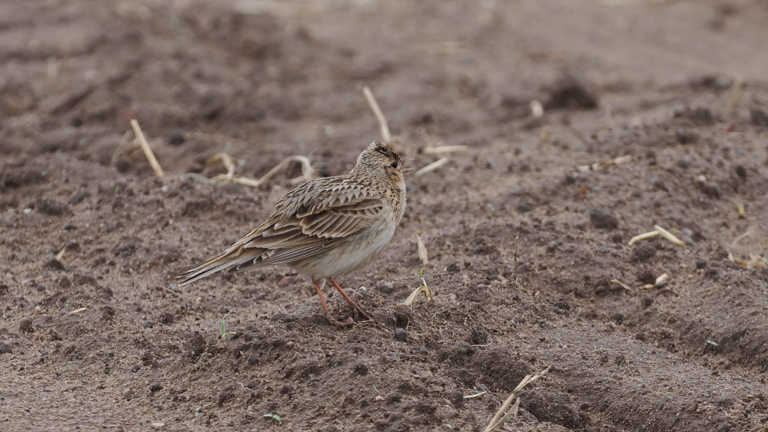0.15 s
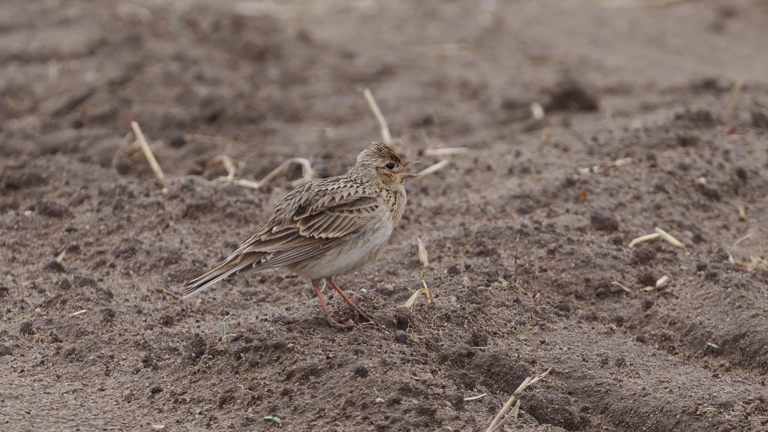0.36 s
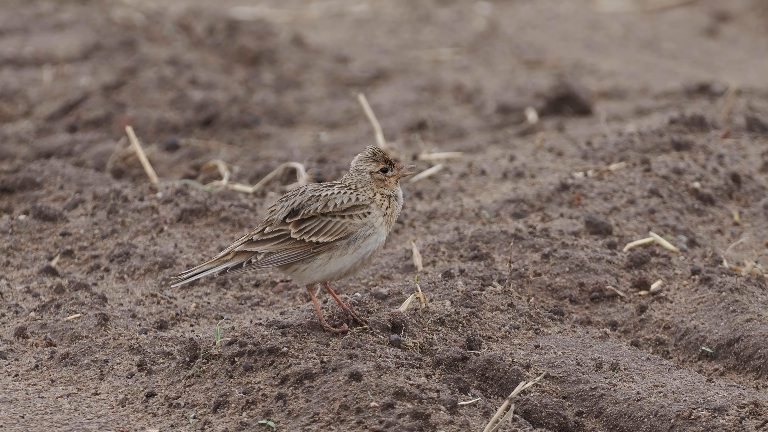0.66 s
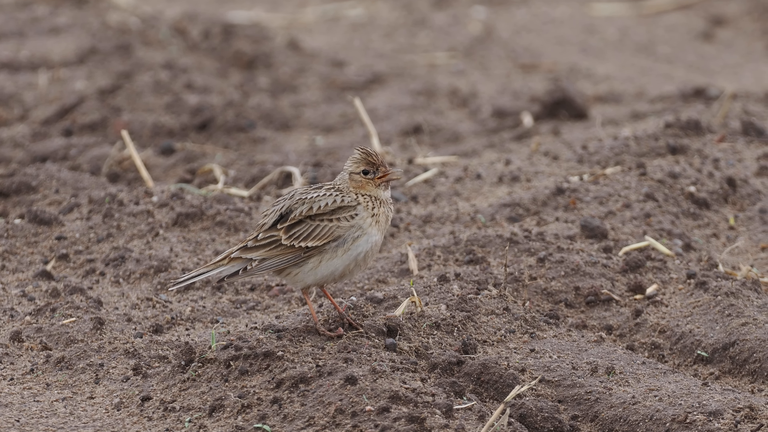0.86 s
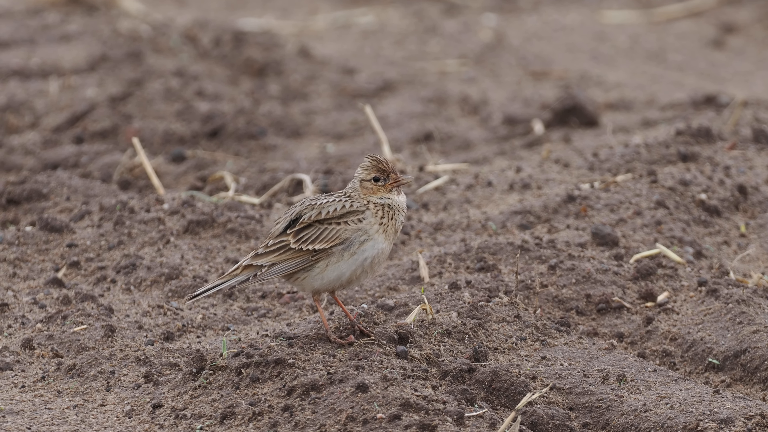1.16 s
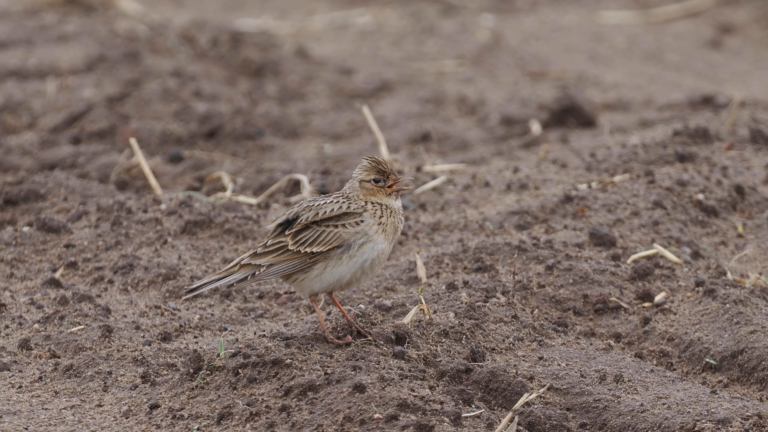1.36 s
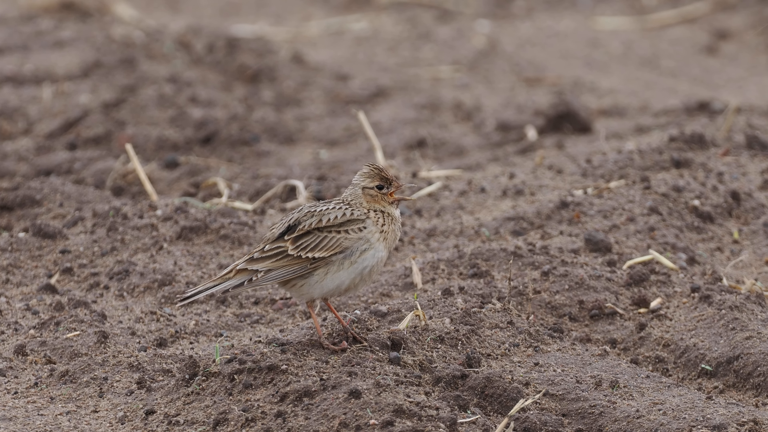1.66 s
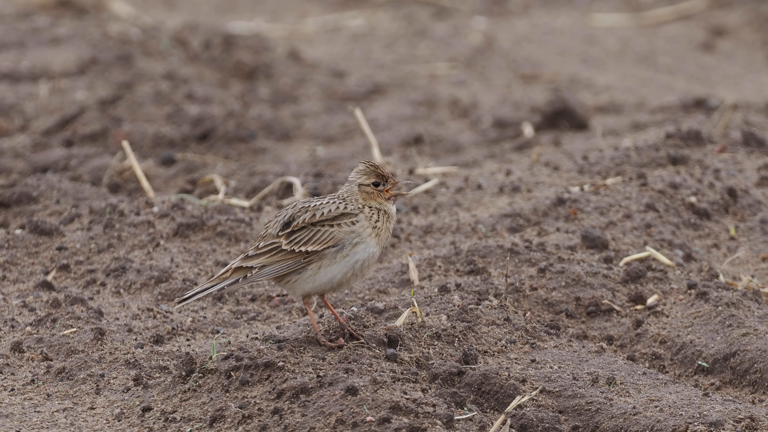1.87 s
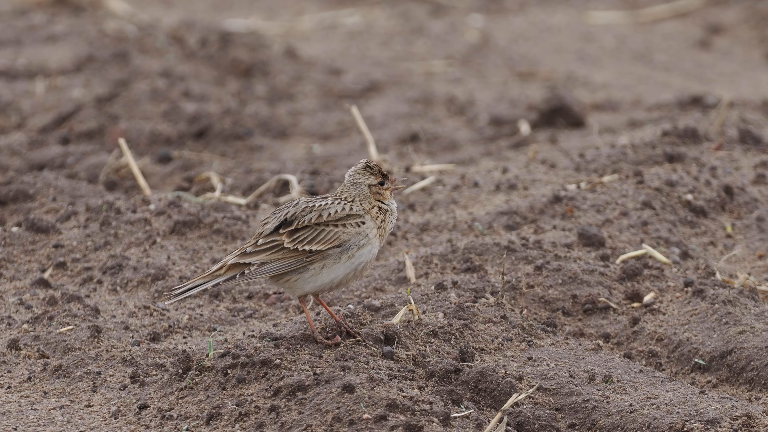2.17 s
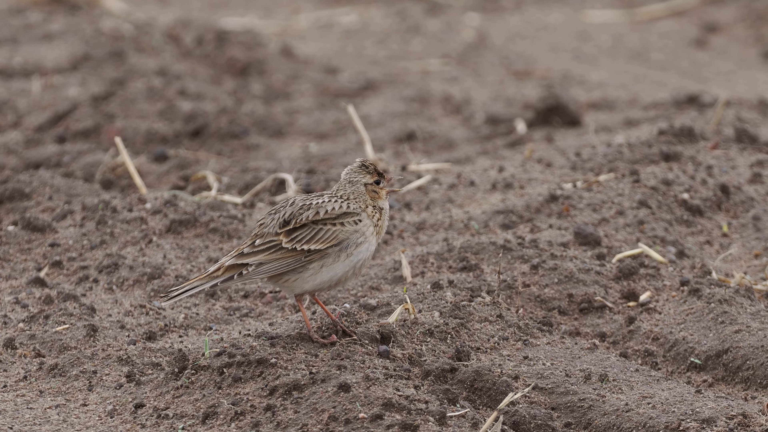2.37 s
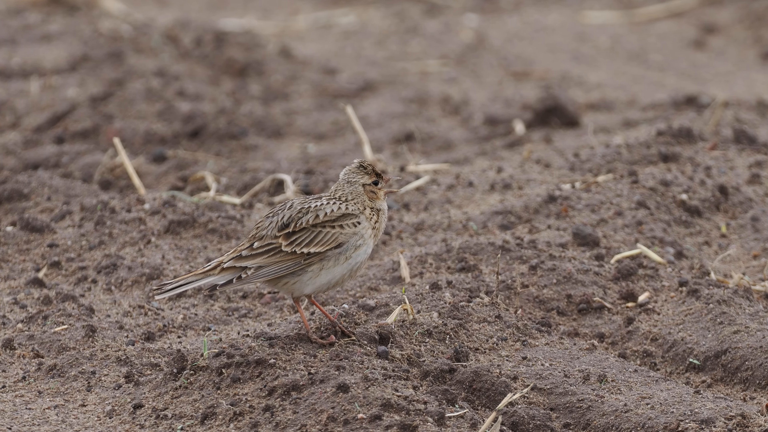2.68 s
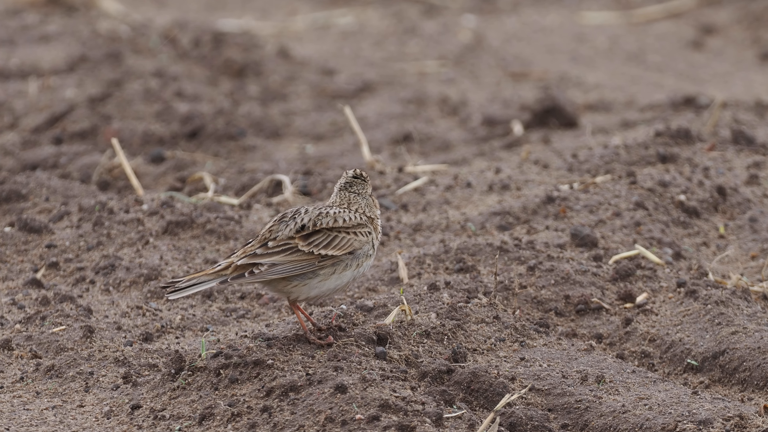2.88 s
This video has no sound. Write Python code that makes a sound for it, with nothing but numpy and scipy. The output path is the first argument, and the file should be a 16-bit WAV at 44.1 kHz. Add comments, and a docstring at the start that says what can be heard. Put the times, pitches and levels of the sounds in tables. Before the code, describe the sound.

Rapid, high skylark song in an open field, with low gusts of wind underneath.

```python
"""Skylark over a windy field

A skylark sings: chirrs, three sliding buzzes, a chatter, a slur into a trill, five pips and a wobbling
whistle. Every syllable is one swept tone with overtones, mostly weak, but with a strong second harmonic
in the chatter. Throat and beak colour the song and the bare ground scatters it briefly.
Wind rumbles on the microphone and gusts buffet its right side, over a faint distant wash."""
import sys
import numpy as np
from scipy import signal
from scipy.fft import rfft, irfft
from scipy.io import wavfile
from scipy.ndimage import uniform_filter1d

SR = 44100
rng = np.random.default_rng(int(sys.argv[2]) if len(sys.argv) > 2 else 0)


def to_wav(s):
    """Save 16-bit WAV."""
    ch = np.atleast_2d(s).T  # columns
    pcm = np.round(np.clip(ch, -1, 1) * 32767)  # PCM
    wavfile.write(sys.argv[1], SR, pcm.astype(np.int16))


N = 132300


def syrinx(hz, level, jitter_hz, overtones_db):
    """The bird's voice: a swept tone and its overtones, each weighted by the beak at its own pitch."""
    # resonances of throat and beak: frequency_hz, gain_db
    beak = [(1800, -13), (2400, -9), (3000, -8), (3700, -12.5), (4000, -12.5), (4400, -4), (5000, -2.5),
            (5600, -13), (6300, -24.5), (7500, -7), (9000, -34.5), (15000, -20)]
    hz = hz + jitter_hz * tremor(np.arange(len(hz)) / SR, top_hz=756)
    phase = 2 * np.pi * np.cumsum(hz) / SR
    return level * sum(amp(db + read(beak, k * abs(hz))) * (k * hz < SR / 2) * np.sin(k * phase)
                       for k, db in enumerate(overtones_db, 1))


def chirrs():
    """In each chirr a head of quick high warbles sinks into a tail of slower low ones."""
    # chirrs: start_s, length_s, tempo_factor, pitch_factor, head_db, tail_db
    cues = [(-.099, 0.12, 0.98, 1.02, -26, -24.5), (0.0575, 0.13, 0.92, .99, -25, -22.5),
            (.219, 0.12, 0.99, 1.01, -22.5, -21), (.387, 0.13, .99, 0.97, -15.5, -21.5),
            (.570, 0.14, 0.97, 0.96, -20.5, -21.5), (1.266, .111, 0.94, 0.95, -7, -21),
            (1.4137, .13, 1, .99, -13.5, -22.5), (1.977, 0.13, 0.96, 0.97, -16.5, -20),
            (2.1395, .122, 0.99, 0.97, -17, -22)]
    # one chirr at tempo and pitch factor 1: time_s, centre_hz, depth_hz, warbles_per_s, tail_share
    course = [(0, 4340, 604, 85, 0), (.014, 4500, 605, 94, 0.38), (.029, 4350, 655, 83, 0),
              (.04, 3750, 754, 70.5, 1), (.054, 3240, 700, 58, 0.9), (.072, 2970, 640, 57.6, 0.99),
              (.125, 2680, 616, 47.8, 1)]
    # one head warble and one tail warble, crest to crest: turn_share, pitch_swing, level_db
    head_warble = [(0, 1, -10), (.13, 0.13, -9.5), (.29, -1.148, -14), (.43, -0.264, 0), (.57, 0.113, 5.5),
                   (.7, 0.039, -2.5), (.84, 0.094, -23.5)]
    tail_warble = [(0, 1.3, -17), (.16, .05, 1.5), (.33, -1.15, -14.5), (.54, -.1, 1.5), (.7, 0.87, -8.5),
                   (.86, -0.082, -12.5)]
    for start, length, tempo, pitch, head_db, tail_db in cues:
        t = np.arange(0, length, 1 / SR)
        centre, depth, rate, tail = follow(course, t * tempo)
        turns = 0.289 + np.cumsum(rate * tempo) / SR  # opens at the bottom of a warble
        swing, db = (1 - tail) * cycle(head_warble, turns) + tail * cycle(tail_warble, turns)
        hz = pitch * (centre + depth * swing)
        level = amp(head_db + (tail_db - head_db) * tail + db) * gate(t, 0.0095, 0.0079)
        yield start, syrinx(hz, level, jitter_hz=50 + 130 * tail, overtones_db=(0, -21, -24))


def buzzes():
    """Falling whistles whose pitch bounces rapidly, loudest at each crest, hoarser as they sink."""
    # buzzes: start_s, length_s, level_db
    cues = [(0.7432, 0.12, -14.5), (0.9157, 0.14, -14.5), (1.089, 0.13, -13.5)]
    # one buzz: time_s, centre_hz, depth_hz (the bounce spans 0.8 of it), bounces_per_s, level_db
    course = [(0, 4454, 620, 310, -23), (.012, 4710, 1015, 300, 2), (.026, 4670, 1200, 290, 4),
              (.046, 4313, 870, 275, 4), (.064, 3850, 1050, 265, 1.5), (.08, 3250, 1020, 255, -6),
              (.103, 2660, 744, 230, -7.5), (.135, 2460, 309, 195.5, -11.5)]
    for start, length, level_db in cues:
        t = np.arange(0, length, 1 / SR)
        centre, depth, rate, db = follow(course, t)
        bounce = np.sin(np.pi * np.cumsum(rate) / SR) ** 2
        hz = centre + .8 * depth * (bounce - .62)
        level = amp(level_db + db) * (0.32 + 0.65 * bounce) * gate(t, 0.0042, 0.0033)
        hoarse = np.clip(t / .075, 0, 1) ** 2
        tone = syrinx(hz, level, jitter_hz=35 + 110 * hoarse, overtones_db=(0, -18, -21))
        sizzle = amp(-43) * tone * rng.standard_normal(len(t))
        yield start, tone + sizzle


def chatter():
    """Phrases of seven short notes that scoop to their pitch; the beak favours their second harmonic."""
    # phrases: start_s, pitch_factor, level_db
    phrases = [(1.5759, 1.01, -24.5), (1.707, 1.01, -23), (1.841, 1.025, -22.5)]
    # notes of a phrase at pitch factor 1: offset_s, length_s, pitch_hz, level_db
    notes = [(0, 0.0062, 2760, 4), (.0095, 0.0058, 3795, 4), (0.018, 0.0092, 3440, -0.5),
             (.030, 0.014, 3200, -2.5), (0.0442, .016, 2840, 1.5), (.063, .018, 2486, -1),
             (0.082, 0.021, 2126, -7)]
    scoop_from_hz, scoop_s, sag_hz_per_s = 2165, 0.0031, 6000
    for start, pitch, level_db in phrases:
        for offset, length, note_hz, db in notes:
            t = np.arange(0, length, 1 / SR)
            scoop = (scoop_from_hz - note_hz) * np.exp(-(t / scoop_s) ** 2)
            hz = pitch * (note_hz + scoop - sag_hz_per_s * t)
            level = amp(level_db + db) * gate(t, 0.005, 0.42 * length)
            jitter_hz = 20 + 90 * np.exp(-offset / 0.033)
            yield start + offset, syrinx(hz, level, jitter_hz, overtones_db=(-6.5, 2, -11.5, -9.5, -17))


def slur():
    """A thin high tone that falls into the beak's resonance."""
    # the downward glide: time_s, pitch_hz, level_db
    course = [(2.322, 6440, -23), (2.333, 6520, -17), (2.343, 6390, -15), (2.350, 5700, -16),
              (2.356, 5110, -13), (2.362, 3680, -33)]
    t = np.arange(course[0][0], course[-1][0], 1 / SR)
    hz, db = follow(course, t)
    level = amp(db) * gate(t - t[0], .002, .002)
    return t[0], syrinx(hz, level, jitter_hz=70, overtones_db=(0, -15))


def trill():
    """Wide fast sweeps that flash each time they cross the beak's resonance."""
    # the trill: time_s, centre_hz, depth_hz, level_db
    course = [(2.363, 4500, 1200, -25), (2.370, 4500, 1200, -19), (2.39, 4550, 1300, -16),
              (2.411, 4550, 1300, -16), (2.422, 4600, 900, -30)]
    turns_per_s, trim_db = 91.5, -0.5
    t = np.arange(course[0][0], course[-1][0], 1 / SR)
    centre, depth, db = follow(course, t)
    swing = -np.cos(2 * np.pi * turns_per_s * (t - t[0]))
    level = amp(trim_db + db - 11 * swing ** 2) * gate(t - t[0], .001, 0.0038)
    return t[0], syrinx(centre + depth * swing, level, jitter_hz=70, overtones_db=(0, -12, -24))


def pips():
    """Short, pure, slightly arched whistles."""
    # pips: start_s, length_s, top_hz, fall_hz, level_db
    cues = [(2.452, 0.028, 4955, 600, -17), (2.498, 0.03, 4906, 300, -18.5),
            (2.543, 0.032, 4872, 243, -17.5), (2.587, 0.033, 4822, 199, -18.5),
            (2.630, 0.036, 4760, 131, -21)]
    crest = 0.16  # share of the length at which the pitch is highest
    for start, length, top_hz, fall_hz, level_db in cues:
        t = np.arange(0, length, 1 / SR)
        hz = top_hz - fall_hz * ((t / length - crest) / (1 - crest)) ** 2
        level = amp(level_db) * gate(t, 0.0088, 0.0059)
        yield start, syrinx(hz, level, jitter_hz=7.4, overtones_db=(0, -11, -16))


def wobble():
    """A whistle that flips between two sinking pitches; the voice nearly breaks at each flip."""
    # the whistle: time_s, upper_hz, lower_hz, wobbles_per_s, level_db
    course = [(2.723, 4620, 3230, 38, -26), (2.745, 4580, 3090, 37, -21.5), (2.776, 4400, 3020, 42, -26.5),
              (2.806, 4060, 2950, 37.6, -27), (2.858, 3900, 2850, 37.5, -27), (2.92, 3684, 2807, 35.3, -27),
              (2.965, 3620, 2770, 36, -30.5)]
    # one wobble, crest to crest: turn_share, height (0 lower pitch, 1 upper), level_db
    one_turn = [(0, .97, -1), (.13, .8, -2), (.22, .25, 0), (.3, -.25, -14), (.42, 0, 0), (.62, .05, -1),
                (.73, .25, -11), (.85, .8, -2)]
    hold_until_s = 2.7295  # stays on the upper pitch until then
    t = np.arange(course[0][0], course[-1][0], 1 / SR)
    upper, lower, rate, db = follow(course, t)
    turns = np.cumsum(rate * (t > hold_until_s)) / SR
    height, turn_db = cycle(one_turn, turns)
    hz = lower + (upper - lower) * height
    hoarse = np.clip(turns / 3, 0, 1)
    level = amp(db + turn_db) * gate(t - t[0], 0.0047, 0.012)
    return t[0], syrinx(hz, level, jitter_hz=15 + 95 * hoarse, overtones_db=(0, -14, -24))


def field(song):
    """Clods near the bird and the ground farther off scatter the song; it sits close to the centre."""
    # the bird's stereo balance: frequency_hz, left_minus_right_db
    balance = [(2500, -5), (3300, 1), (4500, 0.5), (8000, 2.5)]
    clods_db, clods_t60_s = -17, .035
    ground_db, ground_t60_s = -24, .12
    left_lag_s = .000019
    t = np.arange(0, .3, 1 / SR)
    taps = rng.choice([-1., 1.], (2, len(t))) * (rng.random((2, len(t))) < .1)
    near = taps[0] * amp(-60 * t / clods_t60_s) * (t > .002)
    far = (taps + taps[::-1] * .5) * amp(-60 * t / ground_t60_s) * (t > .006)
    echoes = amp(clods_db) * near / np.linalg.norm(near) + amp(ground_db) * far / np.linalg.norm(far[0])
    heard = song + signal.fftconvolve(song[None], echoes, axes=1)[:, :N]
    hz = np.fft.rfftfreq(N, 1 / SR)
    pan_db = read(balance, hz)
    left_delay = np.exp(-2j * np.pi * hz * left_lag_s)
    return irfft(rfft(heard) * [amp(pan_db / 2) * left_delay, amp(-pan_db / 2)], N)


def wind():
    """Wind on the microphone: a steady rumble on both sides, and short gusts on the right."""
    # colour of the rumble, and of a gust at brightness factor 1: frequency_hz, level_db
    rumble_colour = [(12, -8), (25, -8.5), (45, 1.5), (70, -0.5), (100, -9), (150, -22.5), (250, -29),
                     (500, -49.5), (2000, -91.5)]
    gust_colour = [(15, -11), (45, 2), (90, 0), (150, -3), (250, -14), (380, -32), (600, -53), (2000, -100)]
    # gusts: peak_s, rise_s, fall_s, level_db, brightness_factor
    gusts = [(.60, .025, 0.054, -34.5, 1.1), (0.694, 0.017, 0.0087, -18.5, 1.285),
             (1.245, 0.037, .025, -37.5, 0.96), (1.33, 0.025, 0.046, -34.5, 0.43),
             (1.899, 0.016, 0.01, -37, 1.05), (2.039, 0.064, 0.037, -32, 0.89),
             (2.365, 0.03, 0.011, -25, 0.87), (2.419, 0.011, .015, -20, 0.74),
             (2.74, 0.18, 0.084, -36.5, 0.64), (2.92, 0.046, 0.021, -31, 1.05),
             (3.0, 0.015, 0.028, -28.5, 0.9)]
    rumble_db = -40
    t = np.arange(N) / SR
    left, other = [noise(lambda hz: amp(read(rumble_colour, hz))) for _ in range(2)]
    out = amp(rumble_db) * stereo(left, other, likeness=0.74)
    for peak, rise, fall, db, bright in gusts:
        swell = np.exp(-.5 * ((t - peak) / np.where(t < peak, rise, fall)) ** 2)
        puff = swell * noise(lambda hz: amp(read(gust_colour, hz / bright)))
        out[1] += amp(db) * puff * np.linalg.norm(swell) / np.linalg.norm(puff)
    return out


def wash():
    """The even hush of the open country."""
    # colour of the distant wash: frequency_hz, level_db
    colour = [(150, -1), (300, -1.5), (500, -2), (750, 0.5), (1000, 5), (1400, -1.5), (2000, -7.5),
              (3000, -13.5), (5000, -21.5), (8000, -21.5), (12000, -25.5), (16000, -29.5)]
    # how alike its two sides are: frequency_hz, correlation
    likeness = [(100, 0.37), (600, 0.87), (1200, 0.41), (3000, 0.16), (8000, .1)]
    level_db = -50
    hz = np.fft.rfftfreq(N, 1 / SR)
    left, other = rfft(rng.standard_normal((2, N)))
    spectrum = stereo(left, other, read(likeness, hz)) * amp(read(colour, hz))
    return amp(level_db) * unit_rms(irfft(spectrum, N))


def amp(db):
    """Decibels to gain."""
    return 10 ** (np.asarray(db) / 20)


def unit_rms(x):
    """Scales to rms 1."""
    return x / np.sqrt(np.mean(x ** 2) + 1e-20)


def read(points, hz):
    """Reads a spectrum table on a log-frequency axis."""
    f, value = np.transpose(points)
    return np.interp(np.log(hz + 1), np.log(f + 1), value)


def follow(table, t):
    """Reads every column of a course at the times t."""
    at, *columns = np.transpose(table)
    return [np.interp(t, at, c) for c in columns]


def cycle(table, turns):
    """Reads the pitch and level of a repeating gesture, with rounded corners."""
    at, *shape = np.transpose(table)
    return [uniform_filter1d(np.interp(turns, at, c, period=1), size=30) for c in shape]


def gate(t, rise_s, fall_s):
    """Soft attack, hold and release."""
    attack = np.sin(np.pi / 2 * np.clip(t / rise_s, 0, 1))
    release = np.sin(np.pi / 2 * np.clip((t[-1] - t) / fall_s, 0, 1)) ** 2
    return attack * release


def tremor(t, top_hz):
    """Quick random unsteadiness of rms 1."""
    rates, phases = rng.random((2, 24, 1))
    return unit_rms(np.sin(2 * np.pi * (top_hz * rates * t + phases)).sum(0))


def noise(gain):
    """Noise of rms 1, coloured by a function of frequency."""
    return unit_rms(irfft(rfft(rng.standard_normal(N)) * gain(np.fft.rfftfreq(N, 1 / SR)), N))


def stereo(left, other, likeness):
    """Blends two independent noises into a left-right pair with the given correlation."""
    return np.array([left, likeness * left + np.sqrt(1 - likeness ** 2) * other])


def add(mix, start_s, sound):
    """Mixes a sound in, trimming whatever falls outside."""
    at = round(start_s * SR)
    sound = sound[max(-at, 0):]
    part = mix[max(at, 0):][:len(sound)]
    part += sound[:len(part)]


def scene():
    """The song over wind and wash."""
    air = wash() + wind()
    song = np.zeros(N)
    for start, syllable in [*chirrs(), *buzzes(), *pips(), *chatter(), slur(), trill(), wobble()]:
        add(song, start, syllable)
    return field(song) + air


def record(dry):
    """A steep low-pass takes off the very top of the treble."""
    edge_hz = 15900
    lowpass = signal.firwin(511, edge_hz, window=("kaiser", 9), fs=SR)
    return signal.oaconvolve(dry, lowpass[None], "same")


dry = scene()
out = record(dry)
to_wav(out)
```